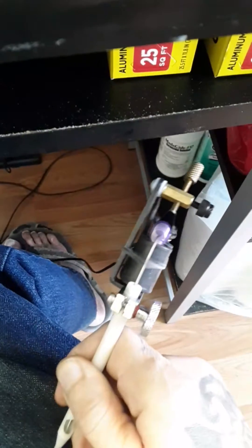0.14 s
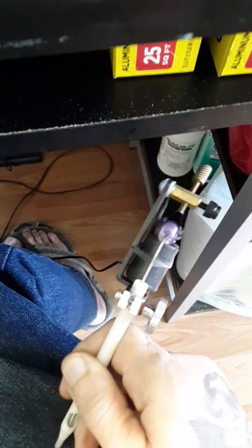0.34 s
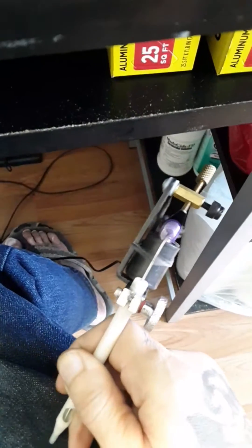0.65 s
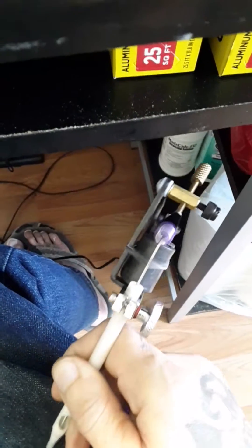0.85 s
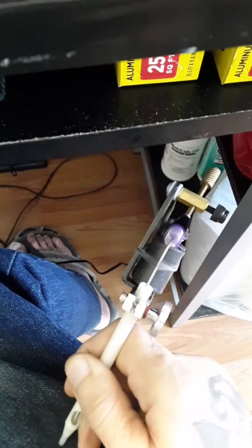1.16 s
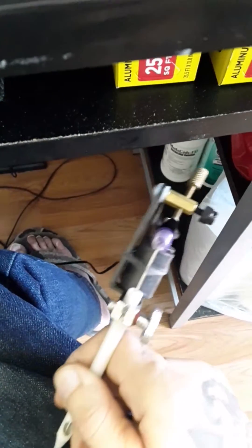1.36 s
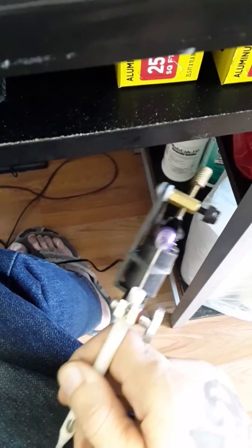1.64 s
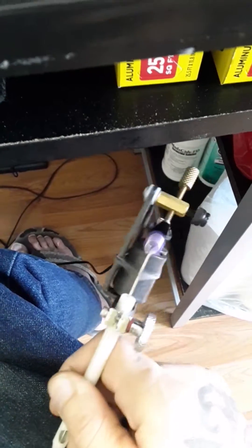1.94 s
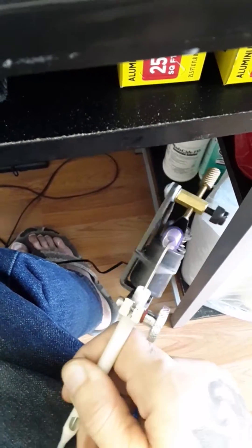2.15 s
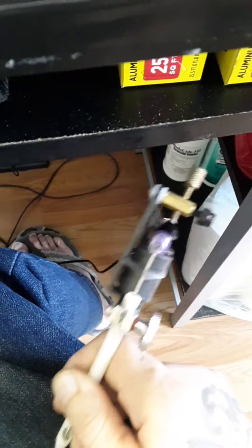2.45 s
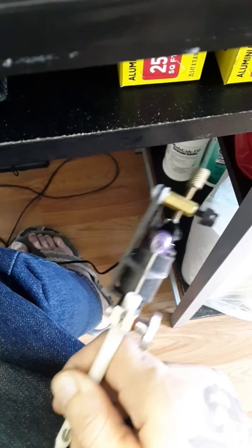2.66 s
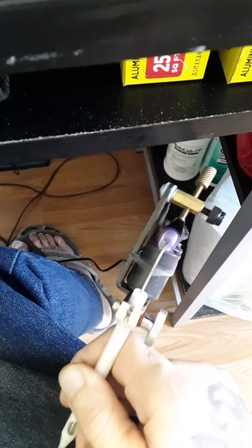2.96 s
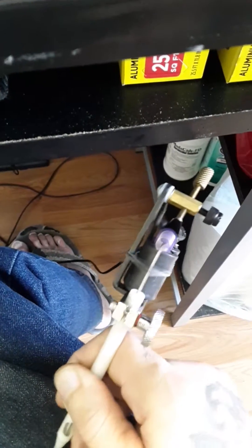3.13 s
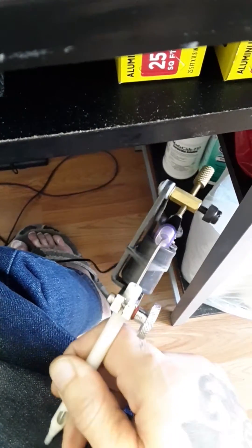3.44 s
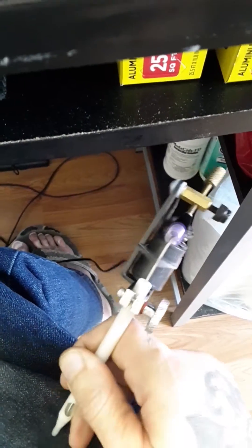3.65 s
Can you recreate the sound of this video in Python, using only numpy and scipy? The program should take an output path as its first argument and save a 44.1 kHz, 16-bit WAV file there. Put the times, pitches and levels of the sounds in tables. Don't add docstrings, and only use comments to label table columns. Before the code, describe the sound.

A coil tattoo machine buzzes continuously up close, bright and metallic, its strength wavering under load.

```python
import sys
import numpy as np
from scipy import signal
from scipy.fft import rfft, irfft, next_fast_len
from scipy.io import wavfile
from scipy.ndimage import uniform_filter1d, map_coordinates

SR = 44100
rng = np.random.default_rng(int(sys.argv[2]) if len(sys.argv) > 2 else 0)


def materialize(psi):
    bounded = np.clip(np.atleast_2d(psi).T, -1, 1)
    quanta = np.round(bounded * 32767).astype(np.int16)
    wavfile.write(sys.argv[1], SR, quanta)


def voltage_ratio(level):
    return 10 ** (np.asarray(level, float) / 20)


N = 167580
TIME_S = np.arange(N) / SR
M = next_fast_len(N + SR // 2)
HZ = np.fft.rfftfreq(M, 1 / SR)


def along(points, hz):
    f, v = np.transpose(points)
    return np.interp(np.log(hz + 1), np.log(f + 1), v)


def unit(x):
    return x / np.sqrt(np.mean(x ** 2) + 1e-20)


def peak(hz, width):
    return 1j * HZ * width / (hz * hz - HZ * HZ + 1j * HZ * width)


def clicks(times, size):
    at = np.clip(times * SR, 8, N)[:, None]
    k = np.floor(at) + np.arange(-4, 6)
    w = np.sinc(k - at) * np.cos(np.pi * (k - at) / 11) ** 2
    return rfft(np.bincount(k.astype(int).ravel(), (w * size[:, None]).ravel(), M))


def wander(times, per_s, points):
    return map_coordinates(rng.standard_normal(points), [times * per_s])


def whine():
    sway = wander(TIME_S, 8, 60)
    tone = voltage_ratio(sway) * np.sin(2 * np.pi * 704.5 * TIME_S + 1.2 * sway)
    return tone * voltage_ratio([[-55], [-81]])


# (frequency [Hz], level [dB per Hz])
AIR_COLOUR = [(20, -24), (38, -17), (62, -7), (188, -0.5), (553, -6), (888, -7.5), (1380, -10), (1950, -53),
              (3300, -120)]
# (frequency [Hz], correlation [0-1])
PORT_LIKENESS = [(30, 0.78), (60, 0.71), (300, 0.66), (700, 0.34), (2000, 0.36)]
# (frequency [Hz], width [Hz], level [dB])
FAN_HUMS = [
    (131.8, 18, -67.5),
    (347.7, 33, -65.5),
]


def room_tone():
    pair = rfft(rng.standard_normal((2, M)))
    turn = np.arccos(np.clip(along(PORT_LIKENESS, HZ), -1, 1)) / 2
    middle, side = np.cos(turn) * pair[0], np.sin(turn) * pair[1]
    both = middle + side * [[1], [-1]]

    def coloured(gain):
        return unit(irfft(gain * both, M)[:, :N])

    air = voltage_ratio(-55) * coloured(voltage_ratio(along(AIR_COLOUR, HZ)))
    hums = sum(voltage_ratio(db) * coloured(peak(hz, width) ** 2) for hz, width, db in FAN_HUMS)
    hiss = voltage_ratio(-42) * coloured(peak(9100, 9100) ** 3)
    return air + hums + hiss


# (time [s], pace [strokes per s])
PACE = [(0, 81.99), (.19, 80.42), (1.098, 80.25), (1.269, 76.59), (1.425, 80.08), (1.491, 81.48),
        (1.74, 77.57), (1.943, 82.04), (2.18, 77.49), (2.376, 82.13), (2.574, 77.92), (2.831, 81.48),
        (2.952, 79.64), (3.532, 81.7), (3.639, 77.44), (3.676, 78.05), (3.8, 80.87)]


def cycles():
    first_stroke = .385
    return np.cumsum(np.interp(TIME_S, *np.transpose(PACE))) / SR - first_stroke


FORCE_DB = [-9.5, -13.5, -7.5, -20, -11, -6.5, -14.5, -6.5, -13, -5, -11.5, -7, -10, -7, -12, -17, -9]


def force_at(times):
    return np.interp(times, np.transpose(PACE)[0], FORCE_DB)


# (multiple of the stroke rate, level [dB])
GRIP_ORDERS = [(1, -66.5), (2, -61), (3, -66), (4, -70.5), (5, -70), (6, -71), (9, -72), (10, -66),
               (11, -75), (13, -68), (16, -65.5), (17, -68), (18, -69.5)]


def grip():
    done, out = cycles(), 0
    force_db = force_at(TIME_S) - np.mean(FORCE_DB)
    pace = np.gradient(done) * SR
    off_tune_db = -2 * (pace - 80.8) ** 2
    for order, db in GRIP_ORDERS:
        sway = wander(TIME_S, 9, 60)
        growth = .2 if order < 8 else .4
        level_db = db + 3.1 * sway + growth * force_db + (order > 8) * off_tune_db
        phase = 2 * np.pi * (order * done + rng.random()) + 0.76 * sway
        out = out + np.sqrt(2) * voltage_ratio(level_db) * np.sin(phase)
    return out * voltage_ratio([[-1.2], [.8]])


# (start [s], end [s])
MISSES = [(1.22, 1.27), (1.285, 1.32), (1.715, 1.762), (1.778, 1.8), (2.215, 2.255), (2.58, 2.628),
          (3.674, 3.686)]
# (time [s], level [dB])
ACCENTS = [(1.2, 4), (1.266, 4), (1.278, 4), (1.329, -0.5), (1.342, 2.5), (1.77, 0), (1.808, -3),
           (1.833, -0.5), (2.208, -4), (2.259, -3.5), (2.634, 3), (3.133, 1), (3.628, 1), (3.693, -0.5)]


def stroke_levels(strokes, luck):
    missed = sum((strokes > start) & (strokes < end) for start, end in MISSES)
    force_db = force_at(strokes) - 17 * missed
    accent_db = .5 * luck + sum(db * (np.abs(strokes - at) < .005) for at, db in ACCENTS)
    return force_db, accent_db


def chatter(strokes):
    knocks_per_s, fade_s = 1500, 0.04
    when = np.sort(rng.random(6000)) * 6000 / knocks_per_s
    last = np.clip(np.searchsorted(strokes, when) - 1, 0, None)
    rattle = np.exp(-np.abs(when - strokes[last]) / fade_s) * (when < N / SR)
    return when, last, rattle


# (time from the blow [s], level [dB], spread [s])
TOUCHES = [
    (-.0004, -16, .0001),
    (0, 0, 0),
    (.0007, -10, .00012),
    (.0026, -13, .0002),
]
# (frequency [Hz], width [Hz], left level [dB], right level [dB], right port later by [ms])
BAR = [(2148, 890, -16, -11, 1.027), (3350, 1140, -14, -15.5, 0.9954), (3874, 545, -12, -6, 0.19),
       (4765, 1050, -10, -17, 0.8845), (5554, 960, -13, -10.5, 1.001), (6560, 530, -23.5, -14, 0.583),
       (7350, 1750, -8, -17, 0.883), (8400, 880, -9, -11.5, 1.36), (9720, 1430, -5, -18, 1.6),
       (11440, 170, -9, -7, 1.9), (12640, 1370, 2, -13, 0.23), (12700, 1000, -20, -11.5, 1),
       (13550, 600, -9, -8, 0.511), (14950, 1600, -7, -12, .3)]
FRAME_HZ = [1935, 7270, 9345, 9785, 10070, 10635, 11190, 11325, 11580, 12090]
# (width [Hz], left level [dB], right level [dB], right port later by [ms])
FRAME = [(40, -13.5, -14.5, 1.035), (100, -3, -4.5, 1.048), (69, -9.5, -11, 1.6), (49.5, -3.5, -7, 1.228),
         (88.5, -13, -13, 1.9), (70, -10, -8, 2.2), (49.3, 1.5, 0.5, 1.5), (67, 6.5, -1, 1.8),
         (80, 0.5, 0, 1.2), (80, -12, -12, 1)]
# (frequency [Hz], growth [dB per dB of force])
GROWTH = [(2000, 0.9), (2700, .35), (3600, .35), (4500, 0.58), (7000, 0.99), (9700, 0.47), (11300, 1.04),
          (12600, 1.1), (15000, 1.1)]
# (frequency [Hz], level [dB])
TICK_COLOUR = [(2000, -5), (5000, -6.5), (7000, -8), (9600, 1), (11000, -9), (12600, -14), (15000, -4)]
# (frequency [Hz], level [dB])
BACK_COLOUR = [(2000, -5), (5000, -12), (6800, 6.5), (9000, -21), (12600, -19), (15000, -12)]
# (frequency [Hz], level [dB])
CHATTER_ON_BAR = [(2000, -5), (3000, -2), (5000, 0), (8300, -1), (10500, -4), (12500, -13), (13700, -9),
                  (15000, -1)]


def machine():
    done = cycles()
    strokes = np.interp(np.arange(int(done[-1]) + 1), done, TIME_S)
    luck = rng.standard_normal((len(strokes), 4 + len(TOUCHES)))
    drift = uniform_filter1d(luck[:, 2:], 14, axis=0)
    luck[:, 2:] = unit(drift) + .15 * luck[:, 2:]
    force_db, accent_db = stroke_levels(strokes, luck[:, 0])
    when, last, rattle = chatter(strokes)

    after, touch_db, spread = np.transpose(TOUCHES)
    touches = (strokes + 1.5e-5 * luck[:, 1])[:, None] + after + spread * luck[:, 4:]
    tick = strokes + 0.000303 + 0.000204 * luck[:, 2]
    back = strokes + 0.0034 + 0.000393 * luck[:, 3]
    times = np.r_[touches.ravel(), tick, back, when]

    out = 0
    frame = [(hz, *row) for hz, row in zip(FRAME_HZ, FRAME)]
    for k, (hz, width, left_db, right_db, later_ms) in enumerate(BAR + frame):
        on_bar = k < len(BAR)
        growth = np.clip(along(GROWTH, hz), .3, 2.2)
        blow = voltage_ratio(growth * (force_db + 8) - 8 + accent_db)
        blow = blow * voltage_ratio(.8 * wander(strokes, 2.5, 40))
        shake = voltage_ratio(-14.5 + along(CHATTER_ON_BAR, hz) * on_bar) * rattle * blow[last]
        shake = shake * rng.standard_normal(len(when))
        tick_size = np.full(len(strokes), voltage_ratio(-18 + along(TICK_COLOUR, hz)))
        back_size = np.full(len(strokes), voltage_ratio(-17 + along(BACK_COLOUR, hz)))
        size = np.r_[np.outer(blow, voltage_ratio(touch_db)).ravel(), tick_size, back_size, shake]

        vary = rng.standard_normal((2, len(size)))
        drive = clicks(times + .8e-5 * vary[0], size * voltage_ratio(.6 * vary[1]))
        ring = drive * peak(hz, width) ** (1 + on_bar)
        left = voltage_ratio(left_db + 0 * HZ)
        right = voltage_ratio(right_db) * np.exp(-2j * np.pi * HZ * later_ms / 1000)
        out = out + ring * np.array([left, right])
    low_cut = (1j * HZ / (1040 + 1j * HZ)) ** 2
    return irfft(voltage_ratio(22) * out * low_cut, M)[:, :N]


# (frequency [Hz], fall by 60 dB [s])
ROOM = [(500, 0.061), (3000, 0.53), (8000, 0.52), (12500, 0.16), (15000, 0.12)]


def space(near):
    hop = round(.12 * SR)
    far = np.zeros((2, N + SR))
    noise = rng.standard_normal((N // hop + 1, 2, SR // 5))
    hz, t, z = signal.stft(noise, SR, nperseg=256)
    fall = voltage_ratio(-60 * t / along(ROOM, hz)[:, None])
    tails = signal.istft(z * fall, SR, nperseg=256)[1]
    for k, tail in enumerate(tails):
        piece = near.mean(0)[None, k * hop:(k + 1) * hop]
        wet = signal.fftconvolve(piece, tail / np.linalg.norm(tail[0]), axes=1)
        far[:, k * hop + 90:][:, :wet.shape[1]] += wet
    return near + voltage_ratio(-6) * far[:, :N]


def scene():
    return room_tone() + whine() + grip() + space(machine())


def roll_off(x):
    return signal.sosfilt(signal.butter(12, 16910, fs=SR, output="sos"), x)


# (frequency [Hz], width [Hz], depth [0-1])
DIPS = [
    (8100, 450, 0.1),
    (11860, 220, 0.4),
    (14030, 900, 0.55),
]


def record(dry):
    fall_hz, top_hz = 15350, 15900
    top = voltage_ratio(-20 * np.clip((HZ - fall_hz) / (top_hz - fall_hz), 0, 1)) * (HZ < top_hz)
    for hz, width, depth in DIPS:
        top = top * (1 - depth * peak(hz, width))
    ceiling = 1.1
    soft = dry / (1 + np.abs(dry / ceiling) ** 4) ** (1 / 4)
    mix = irfft(rfft(soft, M) * top, M)[:, :N]
    return roll_off(mix)


dry = scene()
out = record(dry)
materialize(out)
```